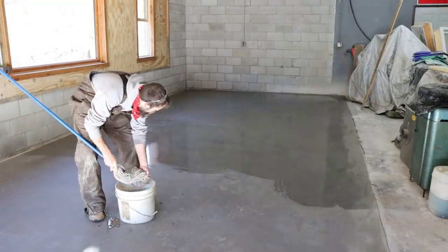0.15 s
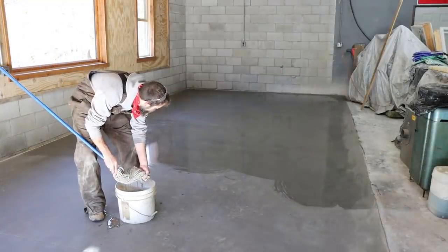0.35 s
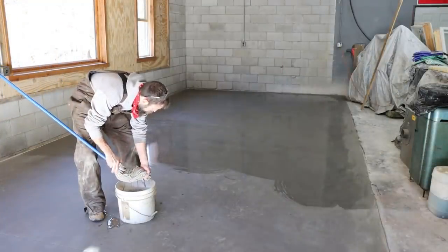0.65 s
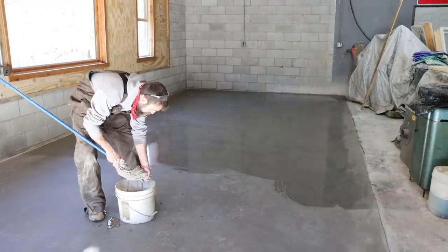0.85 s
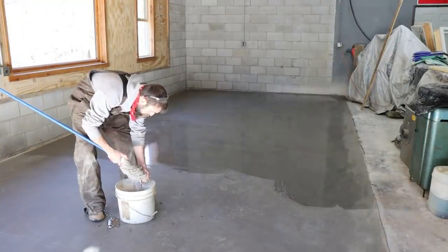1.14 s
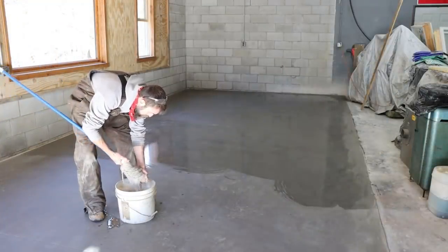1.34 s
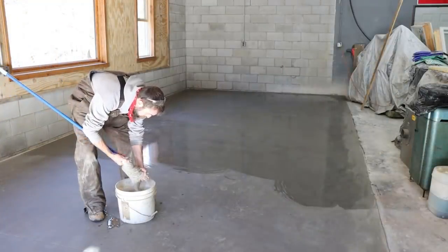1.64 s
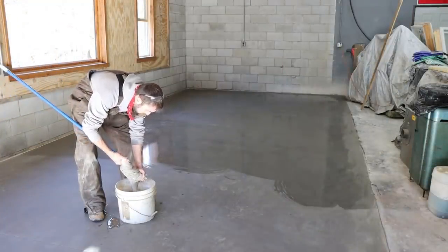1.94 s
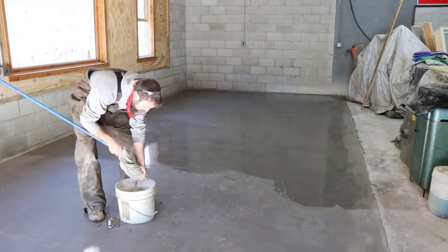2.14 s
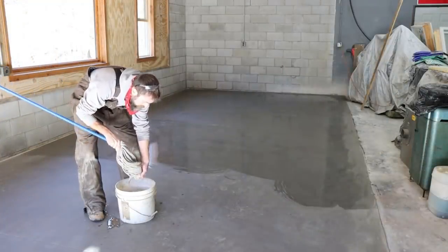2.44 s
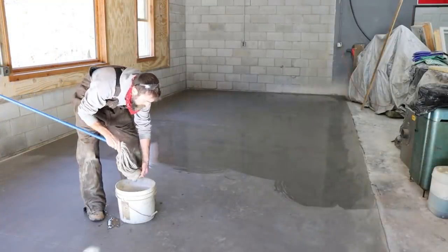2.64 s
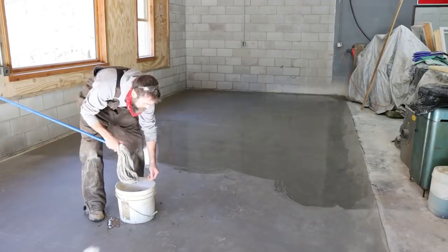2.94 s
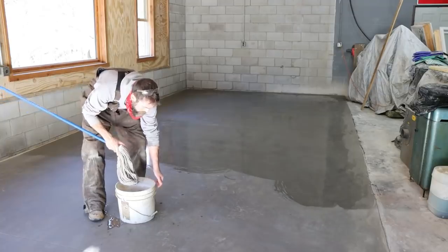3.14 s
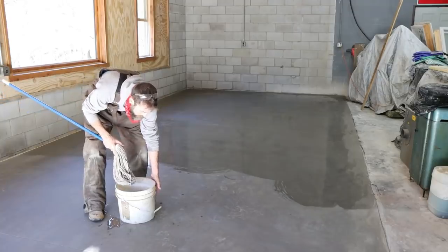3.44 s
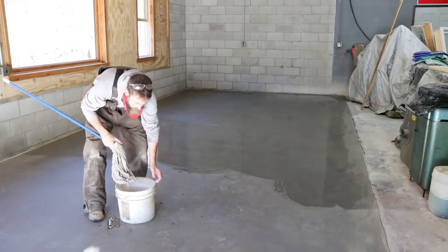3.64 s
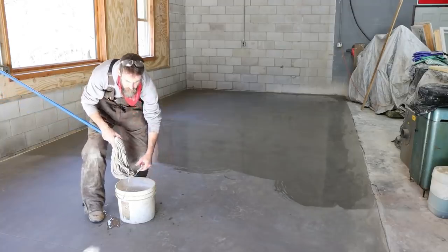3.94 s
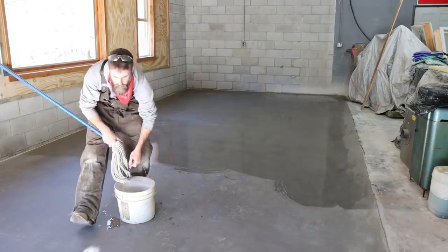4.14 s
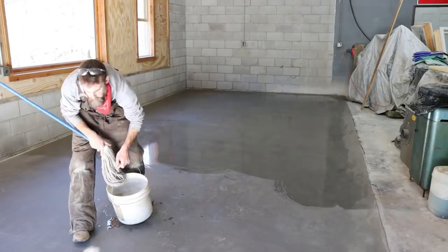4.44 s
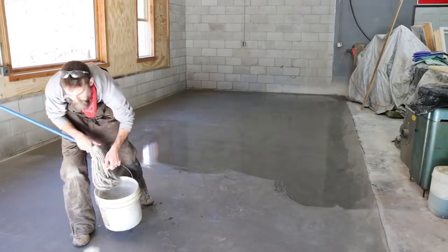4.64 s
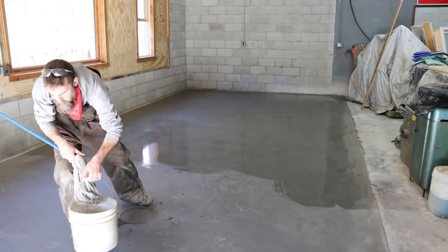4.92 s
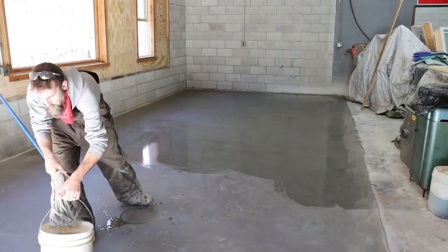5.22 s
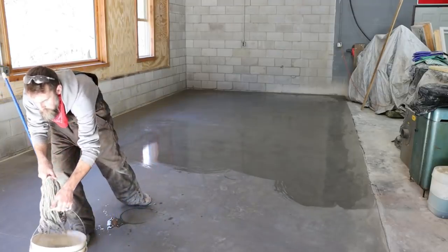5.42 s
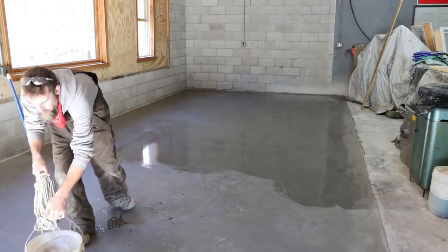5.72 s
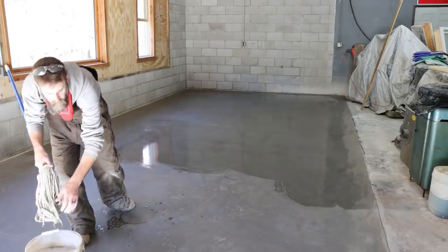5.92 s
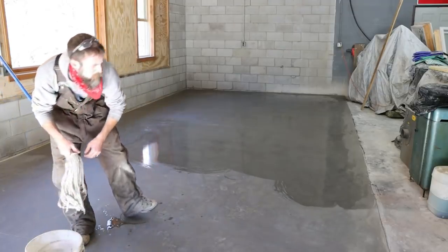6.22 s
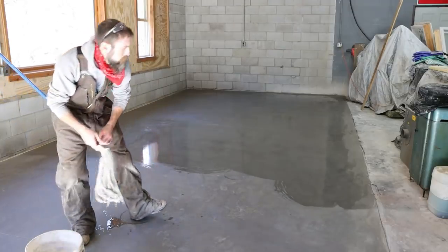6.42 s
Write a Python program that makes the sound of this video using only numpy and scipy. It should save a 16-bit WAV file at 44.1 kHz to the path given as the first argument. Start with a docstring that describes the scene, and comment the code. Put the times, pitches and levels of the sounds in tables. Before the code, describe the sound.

In a quiet, reverberant workshop, a mop is wrung over a plastic bucket: a light trickle, a sudden spurt, then longer splashing squeezes with small plinks. After the water stops, the wire handle clicks and knocks, and soft footsteps and a faint slosh follow. The bucket is set down on the concrete floor, and its handle falls loudly against the plastic and bounces.

```python
"""Water wrung from a string mop trickles, gushes and drips into a plastic bucket: drops snap, bubbles ring.
The wire handle knocks in its sockets as the bucket is picked up; steps, scuffs and sloshes follow.
The base lands on concrete; the handle falls against the wall and bounces. Each blow rings wall and base.
A bare block-walled workshop reverberates. A motor hums far off."""
import sys
import numpy as np
from scipy import signal
from scipy.fft import rfft, irfft, next_fast_len
from scipy.io import wavfile

SR = 44100
rng = np.random.default_rng(int(sys.argv[2]) if len(sys.argv) > 2 else 0)


def unload_audio(sound):
    """Save the sound as a 16-bit wav file, at the path given as the first command line argument."""
    columns = np.transpose(np.atleast_2d(sound))
    # keep every value between -1 and 1, then stretch to whole-number steps
    steps = np.round(np.clip(columns, -1, 1) * 32767)
    wavfile.write(sys.argv[1], SR, steps.astype(np.int16))


N = 289737
TIME_S = np.arange(N) / SR
TOP_HZ = 15900

# Flow from the mop: trickle, spurt, two long squeezes (time [s], flow [dB re full])
MOP_FLOW = [(0, -17), (.15, -16.5), (.5, -15.5), (0.759, -32), (.8, -3), (.85, -7.5), (.95, -13.5),
            (1.1, -7.5), (1.2, -3.5), (1.32, -3), (1.64, 1.5), (1.96, -4.5), (2.04, 1), (2.2, -6.5),
            (2.4, -18), (2.9, -49)]
# Splash spectrum (frequency [Hz], gain [dB])
SPLASH_EQ = [(450, -8.5), (900, 3.5), (1400, -1.5), (2200, 2.5), (2800, -4), (3800, 0.5), (5000, -11),
             (8000, -34)]
# Fine spray spectrum (frequency [Hz], gain [dB])
SPRAY_EQ = [(3500, 9.5), (5500, -3), (8000, -7), (10000, -16), (15000, -19)]
# Deep churn spectrum (frequency [Hz], gain [dB])
CHURN_EQ = [(100, -11), (200, -11), (350, -4), (550, -0.5), (900, -20)]
# Drops that trap a ringing bubble (time [s], pitch [Hz], level [dB])
BUBBLE_DROPS = [(.109, 2200, -41.5), (.111, 1670, -48.5), (.156, 1390, -48), (.223, 927, -39.5),
                (.336, 1322, -52), (.421, 2340, -52), (.723, 2230, -52), (.833, 854, -45),
                (.845, 3140, -45.5), (.897, 3100, -44), (.929, 883, -47.5), (.995, 716, -50.5),
                (1.028, 4030, -47.5), (1.049, 920, -49), (1.162, 1980, -47), (1.182, 1740, -44.5),
                (1.369, 950, -50), (1.392, 594, -48.5), (1.471, 902, -48.5), (1.593, 2408, -42),
                (1.65, 338, -54.5), (1.694, 331, -55.5), (1.745, 298, -57), (2.189, 4100, -45.5),
                (2.786, 3460, -54.5)]
# Drops that smack with little ring (time [s], pitch [Hz], level [dB])
SMACK_DROPS = [(1.2, 5070, -46.5), (1.3245, 2080, -43.5), (1.466, 5360, -45), (1.617, 6260, -41),
               (1.6462, 4100, -33.5), (1.82, 2100, -42), (2.289, 1140, -40.5), (2.318, 3340, -43),
               (2.502, 2720, -49.5)]
# Plastic wall modes (frequency [Hz], gain [dB], T60 before added damping [s])
WALL_MODES = [(869, 2, 0.51), (898, 16, 0.28), (922, 4, 0.27), (1090, -17, 0.23), (1164, 11, 0.16),
              (1365, -8, 0.83), (1416, -7, 0.43), (1410, -4.5, 0.26), (1650, -30, 0.29), (2350, -5, 0.48),
              (2350, -58, 0.083), (2660, -6, 1), (3070, -6, 0.17), (3490, 1, 0.36), (5740, -32, 0.26)]
# Water-loaded base modes (frequency [Hz], gain [dB], T60 before added damping [s])
BASE_MODES = [(111, -10, 0.23), (167, -13.5, 0.21), (208.5, -5, 0.14), (264.5, -8, 0.67), (332, -16, 0.68),
              (418.4, -3, 0.18), (497, -7.5, 0.18), (638, -4, 0.018)]
# Spectrum of the dense wall modes (frequency [Hz], gain [dB])
RATTLE_EQ = [(100, -23.5), (300, -6.5), (650, 1), (900, 2.5), (1400, 5.5), (1900, 0), (3000, -2.5),
             (4500, -10), (6000, -15), (9000, -26), (15000, -48)]
# Handle knocks in its sockets (time [s], gain [dB], pitch [Hz], treble tilt [dB/oct])
SOCKET_KNOCKS = [(3.376, -30, 1000, -1), (3.403, -34.5, 1480, -4), (3.436, -37, 1870, 0.5),
                 (3.454, -39.5, 2250, 5.5), (3.526, -47.5, 1440, 3), (3.736, -42.5, 965, 1),
                 (3.99, -42.5, 1520, 0), (4.053, -45.5, 1510, -1.5), (4.1, -34.5, 1120, -4.5),
                 (4.229, -19.5, 1366, 0), (5.992, -38, 1576, -2.5)]
# Base lands on concrete, rocks flat (time [s], gain [dB], pitch [Hz], base boom [dB])
BASE_LANDINGS = [(5.537, -27, 442, 0), (5.711, -26, 620, -8.5), (5.738, -21.5, 973, -24)]
# Dropped handle bounces on the wall (time [s], gain [dB], pitch [Hz], treble tilt [dB/oct])
HANDLE_BOUNCES = [(6.285, -38, 1110, -0.5), (6.294, -13.5, 906, 3), (6.309, -16, 1400, -0.5),
                  (6.343, -23, 2560, -1), (6.541, -23, 1020, 2.5), (6.565, -24.5, 2700, 1.5)]
# Clothes, boots and base rubbing (time [s], rise [s], gain [dB], centre [Hz])
RUBS = [(3.879, 0.004, -61, 6700), (3.91, 0.01, -55, 1180), (4.08, .03, -59.5, 900),
        (4.162, 0.029, -56.5, 960), (4.667, 0.011, -62.5, 4600), (5.558, 0.044, -64, 5300),
        (5.688, 0.011, -47, 2100), (5.704, 0.012, -36, 590)]
# Soft footfalls (time [s], gain [dB], pitch [Hz])
FOOTFALLS = [(4.278, -40.5, 150), (4.599, -57.5, 212), (5.819, -48, 73.6), (6.475, -50, 131)]
# Water sways after a jolt (time [s], gain [dB])
WATER_SWAYS = [(4.27, -52.5), (4.622, -66), (5.771, -49.5)]
# Room decay (frequency [Hz], T60 [s])
ROOM_DECAY = [(100, 0.59), (300, 0.87), (900, 0.64), (2500, 0.62), (5000, 0.5), (9000, 0.32), (15000, 0.26)]
# Echoes off floor and nearest walls (delay [s], gain [dB])
EARLY_ECHOES = [(.006, -11.5), (.017, -15), (.037, -17.5), (.052, -11)]
# Room air spectrum (frequency [Hz], gain [dB])
AIR_EQ = [(15, -63), (25, -22), (114, -13), (206, -15), (242, -12), (270, -13), (476, -11.5), (531, -12.5),
          (607, -14.5), (911, -12), (1160, -12.5), (2280, -16.5), (3620, -17.5), (5730, -28.5),
          (16000, -41.5)]
# Distant motor partials (frequency [Hz], rms level [dB])
MOTOR_HUM = [(119.6, -100), (239.6, -75.5)]


def wringing(spurt_db=4.0, spurt_s=0.012, spray_lag_s=0.035, churn_lag_s=0.084):
    """Streams hit the water in uneven spurts: splash, fine spray, deep churn, stray drops."""
    times_s, levels_db = np.transpose(MOP_FLOW)
    flow_db = np.interp(TIME_S, times_s, levels_db)
    spray_flow_db = np.interp(TIME_S - spray_lag_s, times_s, levels_db)
    churn_flow_db = np.interp(TIME_S - churn_lag_s, times_s, levels_db)  # deep water stirs late
    running = TIME_S < times_s[-1]
    knots_s = np.arange(0, times_s[-1], spurt_s)
    spurts = undb(spurt_db * np.interp(TIME_S, knots_s, rng.standard_normal(len(knots_s))))
    splash = colour(droplets(568, 7170, cycles=1.3, spread_db=2.5, count=5000), SPLASH_EQ)
    spray = colour(droplets(3300, 19000, cycles=0.31, spread_db=0, count=5000), SPRAY_EQ)
    churn = colour(droplets(104, 920, cycles=0.54, spread_db=4.5, count=1500), CHURN_EQ)
    plinks = colour(droplets(800, 3600, cycles=2.2, spread_db=2.5, count=300), SPLASH_EQ)
    ticks = droplets(5000, 14000, cycles=1.5, spread_db=3, count=130)
    layers = ((splash, -58 + flow_db),
              (spray, -58 + 1.25 * spray_flow_db),
              (churn, -66 + churn_flow_db),
              (plinks, -63 + 0.52 * flow_db),  # stray drops follow the flow loosely
              (ticks, -78 + 0.41 * flow_db))
    return running * spurts * sum(x / np.std(x[running]) * undb(db) for x, db in layers)


def droplets(low_hz, high_hz, cycles, spread_db, count):
    """Cloud of tiny bubbles and impacts; spread_db makes a few stand out."""
    out, end_s = np.zeros(N), MOP_FLOW[-1][0]
    for when, pitch, size, length in rng.random((count, 4)):
        hz = min(low_hz * (high_hz / low_hz) ** pitch, TOP_HZ)
        strength = undb(-spread_db * np.log(1 - 0.98 * size))
        rise_s = cycles * (0.2 + length) / hz
        # small bubbles are brief: higher peak for equal power per Hz
        add(out, when * end_s, strength * hz * bubble(hz, rise_s))
    return out


def plops(drops, rise_cycles, snap_db, snap_t60_s, burst_cycles=16):
    """Large drops snap on the surface; each leaves a bubble that rings until it fades or bursts."""
    out, t = np.zeros(N), np.arange(SR // 100) / SR
    for start_s, hz, db in drops:
        tone = bubble(hz, rise_cycles / hz)
        age = np.arange(len(tone)) * hz / SR / burst_cycles
        add(out, start_s, undb(db) * tone * np.exp(-age ** 6))
        impact = rng.standard_normal(len(t)) * fade(t, snap_t60_s)
        add(out, start_s, undb(db + snap_db) * band(impact, hz, skirt_db_oct=12.5))
    return out


def bubble(hz, rise_s, glide=0.01):
    """A trapped bubble rings, rising in pitch as it nears the surface."""
    t = np.arange(int(9 * rise_s * SR) + 2) / SR
    return swell(t, rise_s) * np.sin(2 * np.pi * hz * t * (1 + glide * t / rise_s / 2))


def bucket():
    """Pick-up, landing, handle drop; a hand damps the socket knocks. Returns (direct, room send)."""
    knocks, landings, clatter, wire = np.zeros((4, N))
    for start_s, db, hz, tilt_db_oct in SOCKET_KNOCKS:
        knock = blow(hz, tilt_db_oct, wall_db=-29.5, base_db=-19,
                     rattle_t60_s=0.041, damping_t60_s=0.19, spot_db=7.5)
        add(knocks, start_s, undb(db) * knock)
        tick = swish(12000, rise_s=0.00074, skirt_db_oct=12)
        add(wire, start_s, undb(db - 27 + tilt_db_oct) * tick)  # steel ticks louder on hard contact
    for start_s, db, hz, boom_db in BASE_LANDINGS:
        thud = blow(hz, tilt_db_oct=-5, wall_db=-32, base_db=boom_db,
                    rattle_t60_s=0.051, damping_t60_s=0.57)
        add(landings, start_s, undb(db) * thud)
    for start_s, db, hz, tilt_db_oct in HANDLE_BOUNCES:
        hit = blow(hz, tilt_db_oct, wall_db=-26.5, base_db=-35.5, rattle_t60_s=0.086, damping_t60_s=0.51)
        add(clatter, start_s, undb(db) * hit)
    room_send = undb(-7.5) * knocks + undb(-6) * (landings + clatter)
    return knocks + wire + landings + clatter, room_send


def blow(spot_hz, tilt_db_oct, wall_db, base_db, rattle_t60_s, damping_t60_s,
         spot_db=8, spot_width_oct=0.15, contact_s=0.0011, knee_hz=1300, low_cut_hz=120):
    """One knock on the bucket: dense modes rattle, the wall rings, the base booms."""
    t = np.arange(SR // 2) / SR
    rattle = colour(rng.standard_normal(len(t)) * fade(t, rattle_t60_s), RATTLE_EQ)
    rings = undb(wall_db) * ring(WALL_MODES, t) + undb(base_db) * ring(BASE_MODES, t)
    attack = 1 - np.exp(-t / contact_s)
    body = (rattle + rings * fade(t, damping_t60_s)) * attack

    def contact_db(octave):
        """Hard contact adds treble; the spot favours its own modes; a small bucket radiates little bass."""
        treble_db = tilt_db_oct * np.maximum(octave - np.log2(knee_hz), 0)
        peak_db = spot_db * np.exp(-((octave - np.log2(spot_hz)) / spot_width_oct) ** 2)
        bass_db = 12 * np.minimum(octave - np.log2(low_cut_hz), 0)
        return treble_db + peak_db + bass_db

    return unit_rms(shape(body, contact_db)) * np.std(body)


def ring(modes, t):
    """Struck modes; each blow shares its force among them differently."""
    draws = rng.standard_normal((len(modes), 2))
    return sum(undb(db + 2 * jitter) * np.sign(polarity) * fade(t, t60_s) * np.sin(2 * np.pi * hz * t)
               for (hz, db, t60_s), (jitter, polarity) in zip(modes, draws))


def carrying():
    """Scuffs, footfalls and swaying water as the bucket is moved."""
    out = np.zeros(N)
    for start_s, rise_s, db, hz in RUBS:
        add(out, start_s, undb(db) * swish(hz, rise_s, skirt_db_oct=11.5))
    for start_s, db, hz in FOOTFALLS:
        add(out, start_s, undb(db) * swish(hz, rise_s=0.0035, skirt_db_oct=8.5))
    for start_s, db in WATER_SWAYS:
        add(out, start_s, undb(db) * swish(hz=294, rise_s=0.022, skirt_db_oct=9.5))
    return out


def swish(hz, rise_s, skirt_db_oct, grit_db=3.5, grain_samples=32):
    """Gritty noise swell around one pitch."""
    t = np.arange(SR // 2) / SR
    grit = undb(grit_db * np.repeat(rng.standard_normal(len(t)), grain_samples)[:len(t)])
    grains = unit_rms(rng.standard_normal(len(t)) * grit)
    return band(grains * swell(t, rise_s), hz, skirt_db_oct)


def workshop(x, build_s=0.0083):
    """Concrete and block walls: early echoes, then a diffuse tail that loses treble first."""
    t = np.arange(SR) / SR
    bands_hz, decays_s = np.transpose(ROOM_DECAY)
    spectrum, tail = rfft(rng.standard_normal(SR)), np.zeros(SR)
    for selector, t60_s in zip(np.eye(len(bands_hz)), decays_s):
        band_gain = np.interp(bin_octaves(SR), np.log2(bands_hz), selector)
        tail += irfft(spectrum * band_gain, SR) * fade(t, t60_s)
    tail *= 1 - np.exp(-(t / build_s) ** 2)
    response = tail / np.linalg.norm(tail)
    for delay_s, db in EARLY_ECHOES:
        add(response, delay_s, undb([db]))
    return signal.fftconvolve(x, response)[:N]


def background(air_db=-67):
    """Steady room air and distant motor hum."""
    air = undb(air_db) * unit_rms(colour(rng.standard_normal(N), AIR_EQ))
    hum = sum(np.sqrt(2) * undb(db) * np.sin(2 * np.pi * hz * TIME_S) for hz, db in MOTOR_HUM)
    return air + hum


def undb(db):
    """Decibels to gain."""
    return 10 ** (np.asarray(db) / 20)


def unit_rms(x):
    """Scale to rms 1."""
    return x / np.sqrt(np.mean(x ** 2))


def add(out, start_s, x):
    """Mix x into out at start_s."""
    i = int(start_s * SR)
    out[i:i + len(x)] += x[:max(len(out) - i, 0)]


def fade(t, t60_s):
    """Exponential decay, -60 dB at t60_s."""
    return np.exp(-np.log(1000) * t / t60_s)


def swell(t, rise_s):
    """Rise to 1 at rise_s, then decay."""
    return t / rise_s * np.exp(1 - t / rise_s)


def bin_octaves(n):
    """Octave positions of the bins of an n-point spectrum."""
    return np.log2(np.fft.rfftfreq(n, 1 / SR) + 1)


def shape(x, gain_db):
    """Minimum-phase filter from gain_db(octave); keeps white-noise power."""
    n = next_fast_len(len(x), real=True) * 2
    gain = undb(np.maximum(gain_db(bin_octaves(n)), -100))
    cepstrum = irfft(np.log(unit_rms(gain)), n)
    cepstrum[1:n // 2] *= 2
    cepstrum[n // 2 + 1:] = 0
    return irfft(rfft(x, n) * np.exp(rfft(cepstrum)), n)[:len(x)]


def band(x, hz, skirt_db_oct):
    """Band-pass peaked at hz."""
    return shape(x, lambda octave: -skirt_db_oct * abs(octave - np.log2(hz)))


def colour(x, points, skirt_db_oct=18):
    """Filter by (frequency [Hz], gain [dB]) points; roll off past the ends."""
    hz, db = np.transpose(points)
    knots_oct = np.log2(hz)
    return shape(x, lambda octave: np.interp(octave, knots_oct, db)
                 - skirt_db_oct * abs(octave - np.clip(octave, knots_oct[0], knots_oct[-1])))


def scene(water_send_db=-5, carry_send_db=-4, rim_hz=2600):
    """Water, bucket and steps in one room; mono."""
    water = wringing()
    water += plops(BUBBLE_DROPS, rise_cycles=4.26, snap_db=-9, snap_t60_s=0.0091)
    water += plops(SMACK_DROPS, rise_cycles=1, snap_db=-5.5, snap_t60_s=0.018)
    carry = carrying()
    knocks, knock_send = bucket()
    # the bucket's mouth beams treble upward, spreads lows into the room
    water_send = signal.lfilter(*signal.butter(1, rim_hz, fs=SR), water)
    room = workshop(undb(water_send_db) * water_send + undb(carry_send_db) * carry + knock_send)
    return (water + carry + knocks + room + background())[None]


def record(dry):
    """Steep low-pass at TOP_HZ."""
    return signal.sosfilt(signal.ellip(10, 0.2, 70, TOP_HZ, fs=SR, output="sos"), dry)


dry = scene()
out = record(dry)
unload_audio(out)
```